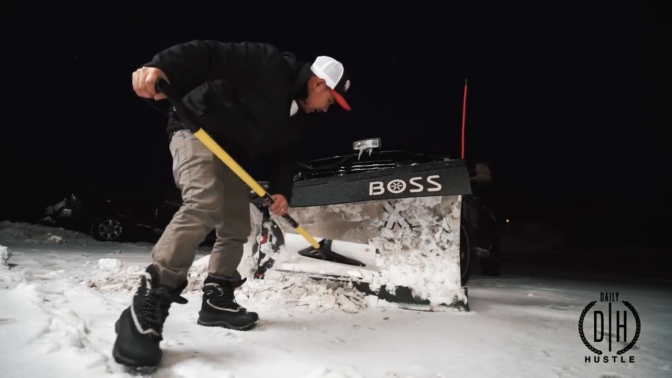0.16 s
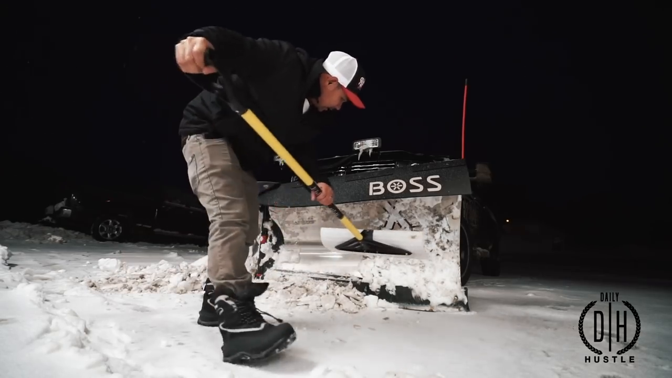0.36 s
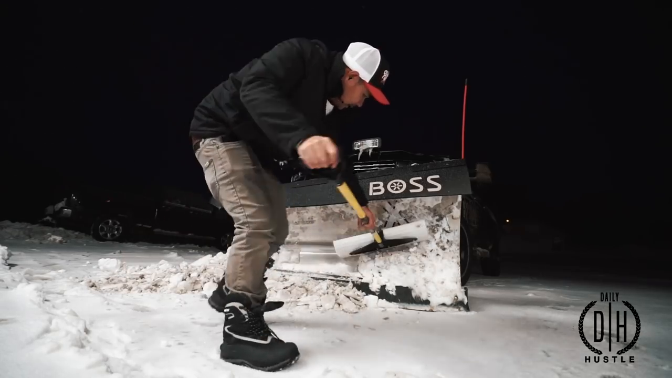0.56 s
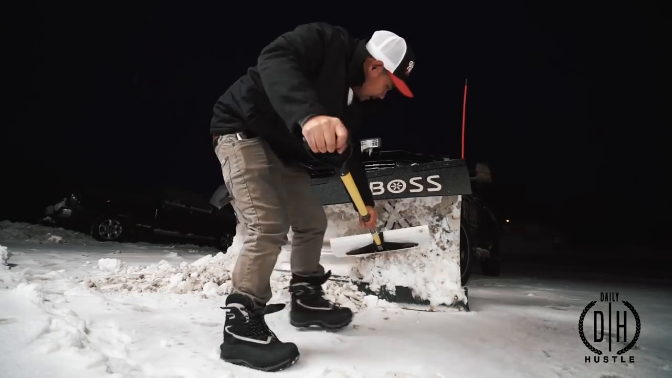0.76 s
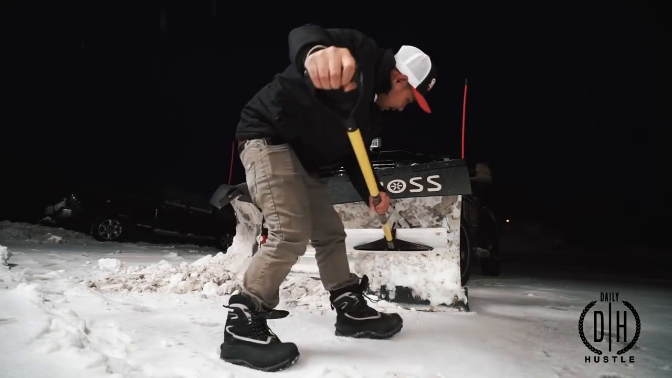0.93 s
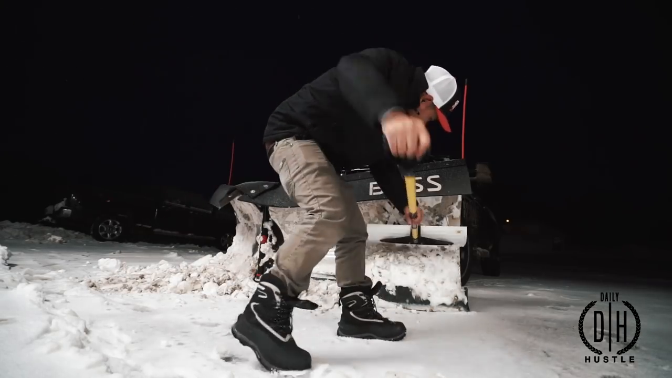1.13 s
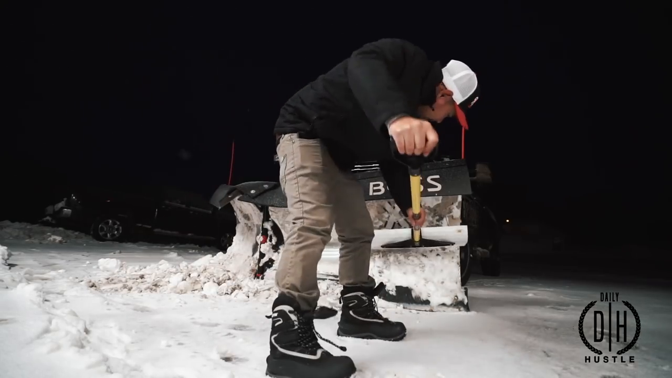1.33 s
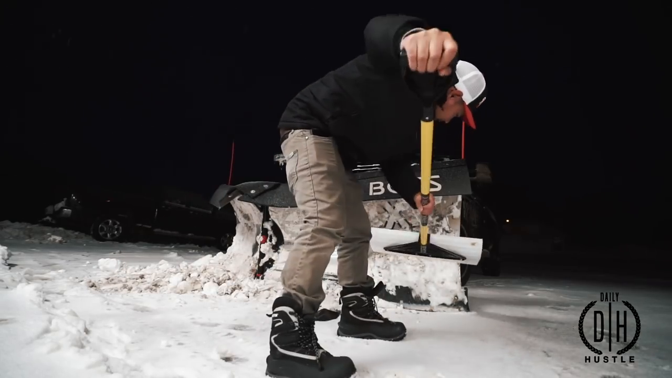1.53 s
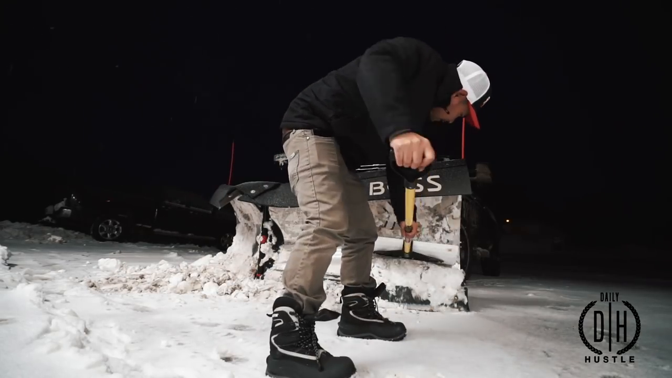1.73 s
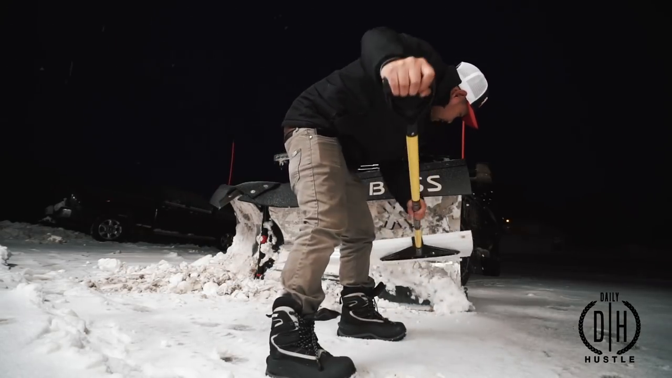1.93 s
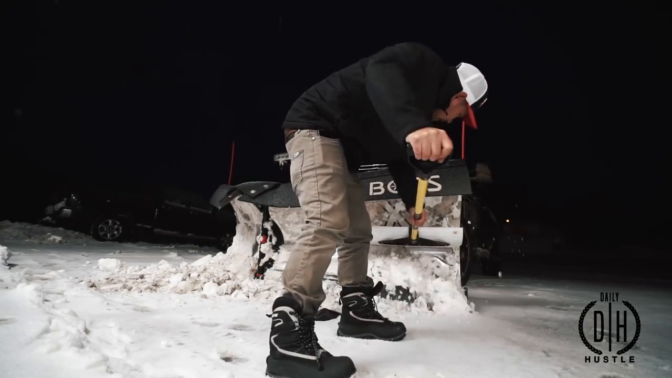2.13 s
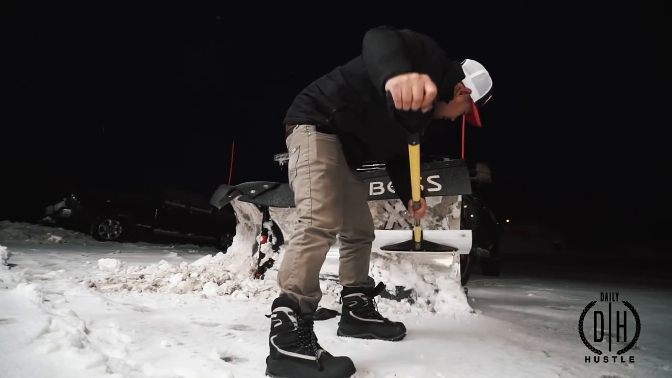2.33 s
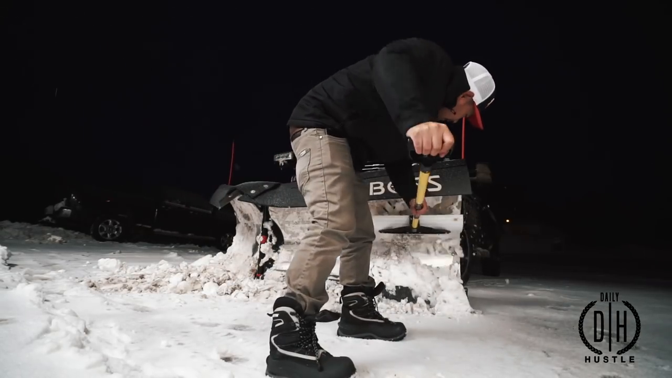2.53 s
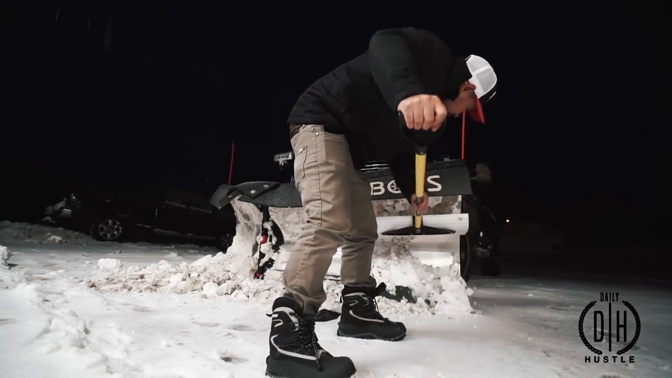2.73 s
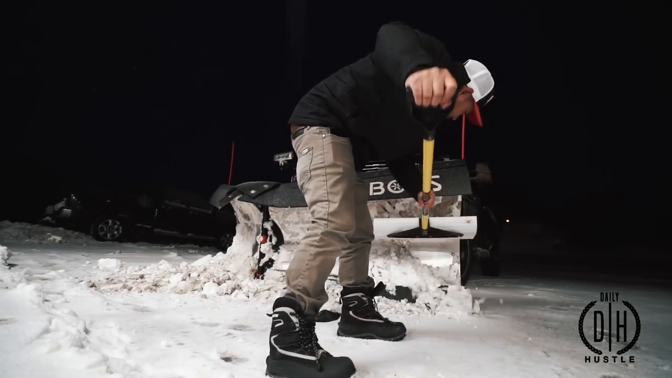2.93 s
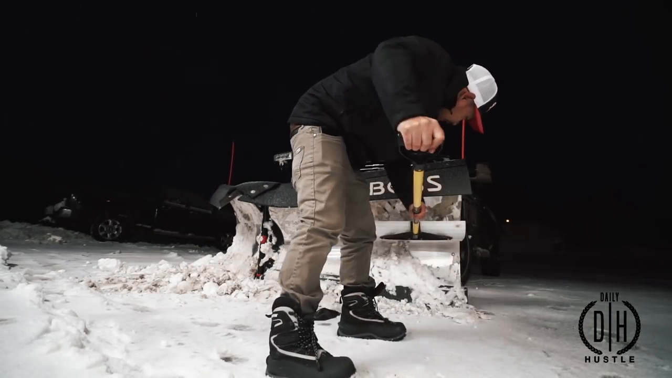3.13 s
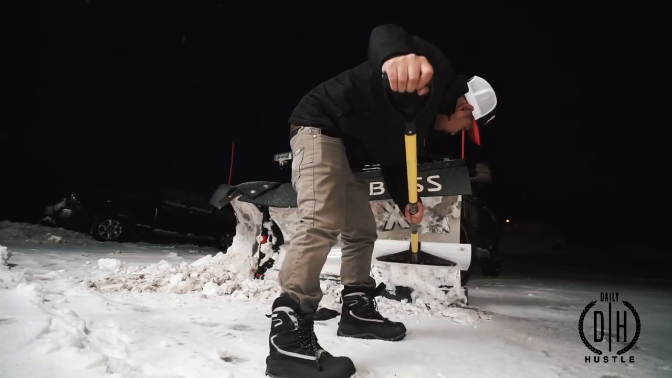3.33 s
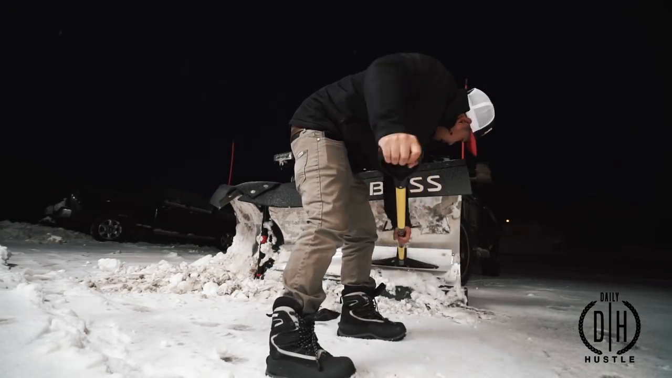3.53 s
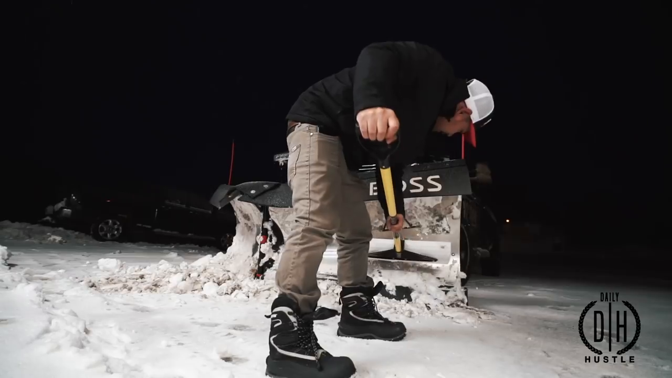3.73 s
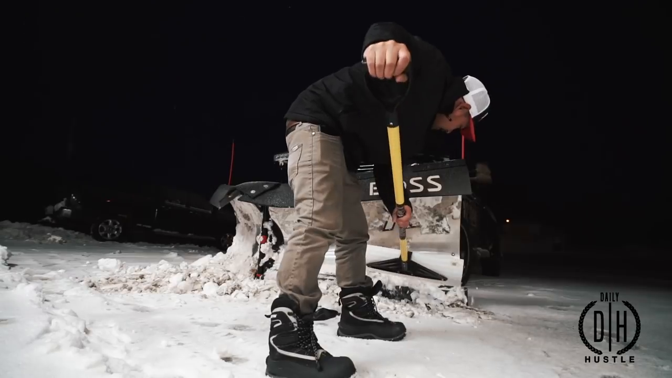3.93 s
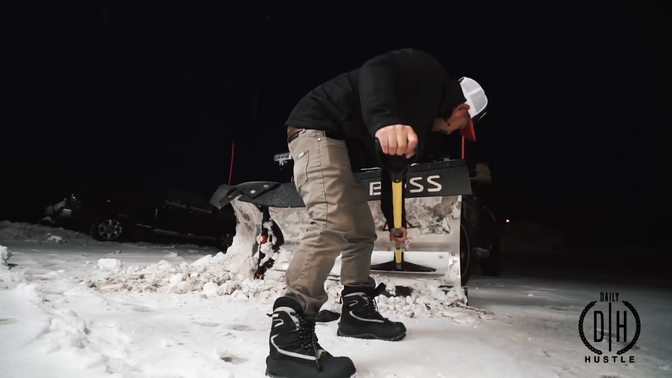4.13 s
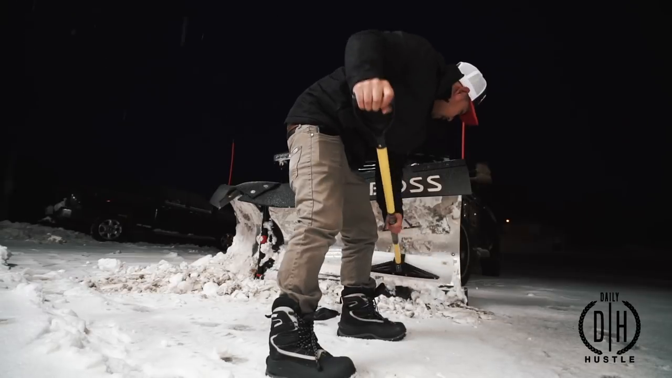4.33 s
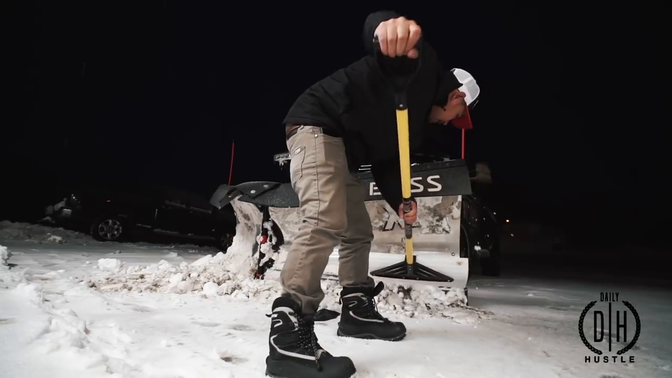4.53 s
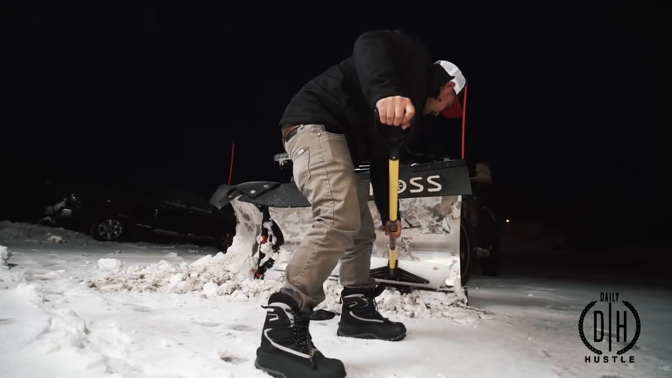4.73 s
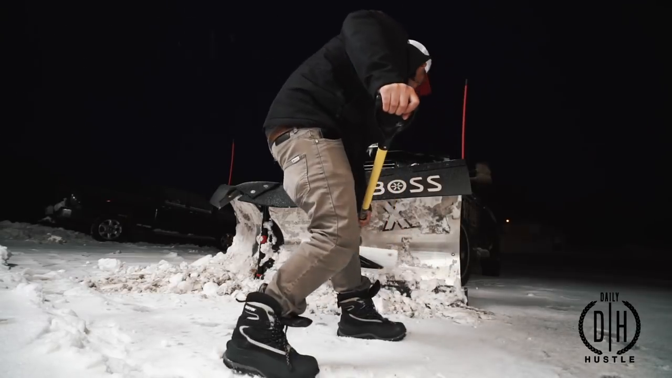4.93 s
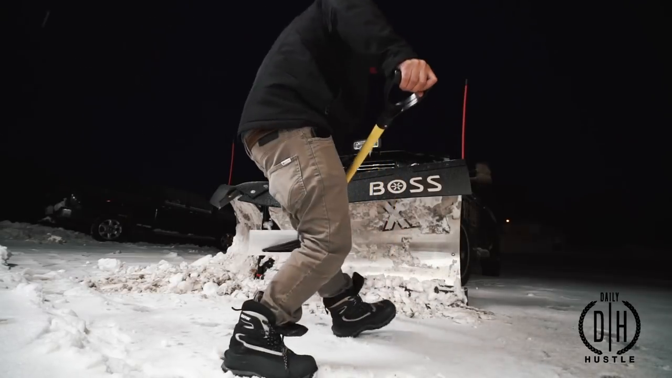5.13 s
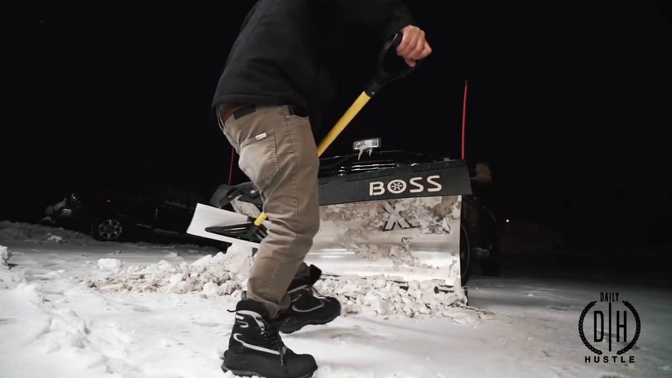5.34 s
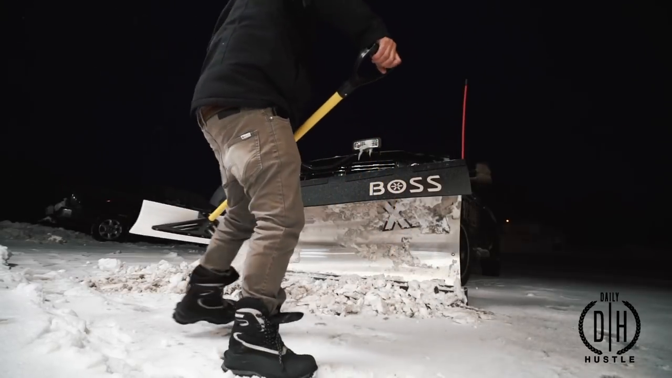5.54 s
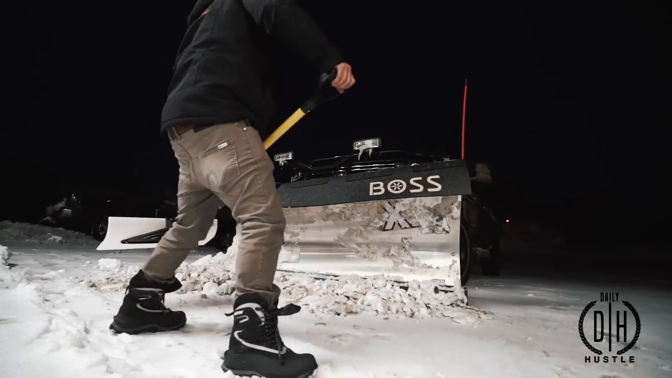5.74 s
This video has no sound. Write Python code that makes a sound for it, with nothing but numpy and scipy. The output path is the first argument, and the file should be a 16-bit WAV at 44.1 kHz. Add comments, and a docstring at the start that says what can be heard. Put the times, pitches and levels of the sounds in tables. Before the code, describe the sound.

Outdoors at night, a plastic shovel breaks packed snow from a steel plow blade. Light crunches come first, then nine hard, quick chops, each a bright crack with a dull low metallic thump and a short scrape. Crumbs slide between blows. The chopping ends just before five seconds, with a brief snow rush and faint ticks over a low idling engine. Close microphone, mono, slightly overloaded on the loudest hits.

```python
"""A plastic shovel chops and scrapes packed snow off a steel plough blade, outdoors at night.
Each chop is a burst of grains for the breaking crust, plus noise that excites the shovel's resonances.
Dull thumps and driven strokes excite the blade's low modes; scraping, sliding snow and specks are
random clicks, dense or scattered. A truck idles nearby as a sum of engine orders, over steady filtered noise.
A limiter ducks everything under the loud blows, and the highest peaks clip."""
import sys
import numpy as np
from scipy import signal
from scipy.fft import rfft, irfft, next_fast_len
from scipy.io import wavfile
from scipy.ndimage import uniform_filter1d

SR = 44100
rng = np.random.default_rng(int(sys.argv[2]) if len(sys.argv) > 2 else 0)


def dump(signal):
    """Clip the signal to [-1, 1] and save it as 16-bit WAV at the path in sys.argv[1]."""
    limited = np.clip(np.atleast_2d(signal).T, -1, 1)
    pcm = np.round(limited * 32767).astype(np.int16)
    wavfile.write(sys.argv[1], SR, pcm)


N = 259308

# resonances of the steel blade: (frequency [Hz], width [Hz], relative gain [dB])
BLADE_MODES = [(146, 36, 9), (229, 43, 16), (262, 64, 4.5), (335, 79, 11.5), (420, 31, -8.5), (501, 17, -1),
               (546, 30, -40.5)]
# resonances of the plastic shovel: (frequency [Hz], width [Hz], relative gain [dB])
SHOVEL_MODES = [(738, 99, 9), (997, 230, 4), (1151, 70, 17), (1290, 80, 9.5), (1443.5, 40, 8)]
# spectrum of breaking crust: (frequency [Hz], relative gain [dB])
CRUST_SPECTRUM = [(290, -16.5), (500, -8.5), (1650, -11), (3320, -9.5), (4380, -12), (5210, -17.5),
                  (9070, -16.5), (9750, -15.5), (14400, -57.5), (16200, -103)]
# spectrum of loose crumbs: (frequency [Hz], relative gain [dB])
CRUMB_SPECTRUM = [(240, -31.5), (400, -20), (688, -9), (983, -6), (1170, -6), (1940, -6.5), (3610, -12.5),
                  (9440, -25.5), (16200, -31.5)]


def amp(db):
    """Decibels to amplitude ratio: 20 dB is a factor of ten."""
    return 10 ** (np.asarray(db) / 20)


def evened(x):
    """Normalization to an rms of one."""
    return x / np.sqrt(np.mean(x ** 2) + 1e-20)


def along(rows):
    """Linear interpolation of a time table's columns, one value a sample."""
    times, *columns = np.transpose(rows)
    return [np.interp(np.arange(N) / SR, times, column) for column in columns]


def colour(x, points, tilt_db=0.):
    """Spectral shaping in the frequency domain, with a tilt in dB an octave about 3 kHz."""
    size = next_fast_len(len(x) + 512)
    hz = np.fft.rfftfreq(size, 1 / SR) + 1  # the offset keeps the logarithm finite
    point_hz, point_db = np.transpose(points)
    shape_db = np.interp(np.log(hz), np.log(point_hz), point_db)
    shape_db += tilt_db * np.log2(np.maximum(hz, 500) / 3000)  # no further tilt below 500 Hz
    return irfft(rfft(x, size) * amp(shape_db), size)[:len(x)]


def ring(x, modes):
    """Modal superposition: parallel two-pole resonances, each of the given gain at its peak."""
    out = np.zeros(len(x))
    for hz, width, db in modes:
        b, a = signal.iirpeak(hz, hz / width, SR)
        out += amp(db) * signal.lfilter(b, a, x)
    return out


def resonate(x, hz, width):
    """Resonance at a moving pitch by heterodyning: shift down, smooth twice, shift back."""
    carrier = np.exp(2j * np.pi * np.cumsum(hz * np.ones(len(x))) / SR)
    pole = np.exp(-np.pi * width / SR)
    smoothed = signal.lfilter([1], np.convolve([1, -pole], [1, -pole]), x / carrier)
    return (carrier * smoothed).real


def steadied(x, s):
    """Automatic gain: divides by a running rms over s seconds, with a floor for quiet parts."""
    power = uniform_filter1d(x ** 2, round(s * SR))
    return x / np.sqrt(power + 0.054 * np.mean(x ** 2))


def grit(per_s, spread_db, count=N):
    """Random impulses at a mean rate, of uneven size and random polarity."""
    chance = rng.random(count)
    size = np.minimum(rng.exponential(1, count), 4)
    polarity = rng.standard_normal(count)
    return (chance < per_s / SR) * amp(spread_db * size) * polarity


def add(mix, s, sound):
    """Superposition: mixes a sound in at a time, cut at the end of the mix."""
    part = mix[round(s * SR):][:len(sound)]
    part += sound[:len(part)]


def night():
    """Stationary noise shaped by filtering: steady far rumble and hiss."""
    # spectrum of the night: (frequency [Hz], relative gain [dB])
    night_spectrum = [(35, -28), (60, -20), (136, -33), (340, -38.5), (382, -33.5), (410, -37.5),
                      (569, -38), (625, -50), (13500, -71), (16200, -67.5)]
    return amp(-42.5) * evened(colour(rng.standard_normal(N), night_spectrum))


def truck():
    """Harmonic synthesis: low multiples of an engine's firing rate, each wavering a little."""
    # the idling engine: (time [s], firing rate [Hz], level [dB])
    idle = [(0, 25.23, -29), (1.5, 25.83, -29), (3, 26.2, -34), (4.5, 25.73, -36.5), (5.88, 25.37, -35.5)]
    # its harmonics: (multiple of the firing rate, relative level [dB])
    orders = [(2, -2.5), (3, -15.5), (4, -16.5), (8, -23)]
    firing_hz, level_db = along(idle)
    cycles = np.cumsum(firing_hz) / SR
    out = np.zeros(N)
    for k, order_db in orders:
        drift = uniform_filter1d(rng.standard_normal(N), 3000)
        waver = evened(uniform_filter1d(drift, 3000))
        # higher orders waver more, both in level and in phase
        phase = 2 * np.pi * (round(k) * cycles + 0.045 * k * waver)
        out += amp(order_db + 0.15 * k * waver) * np.sin(phase)
    return np.sqrt(2) * amp(level_db) * out


def specks():
    """Isolated impacts: now and then a single ice speck ticks on the steel."""
    return amp(-66) * evened(colour(grit(30, 2.5), CRUST_SPECTRUM, 2.5))


def slides():
    """Granular noise: rushes of sliding snow and two short ticks, as dense grains with quick edges."""
    # rushes of snow, and two short ticks near 5.07 and 5.28 s:
    # (start [s], end [s], level [dB], brightness [dB an octave])
    grain_bursts = [(0.017, 0.1, -40, -11), (1.007, 1.084, -34.5, 0.5), (3.429, 3.478, -34.5, -3.5),
                    (4.319, 4.366, -31, -0.5), (4.903, 5.035, -35, -0.5), (5.117, 5.245, -40.5, 0.3),
                    (5.07, 5.086, -40, 3.5), (5.284, 5.305, -43, 5), (5.786, 5.849, -44, 0.5)]
    out = np.zeros(N)
    for start, end, db, tilt_db in grain_bursts:
        count = round((end - start) * SR)
        clumps = evened(uniform_filter1d(rng.standard_normal(6000), 500))
        grains = colour(grit(6000, 2.2, count=6000), CRUMB_SPECTRUM, tilt_db)
        burst = evened(grains * amp(2.5 * clumps))[:count]
        add(out, start, amp(db) * burst * signal.windows.tukey(len(burst), .2))
    return out


def drag():
    """Stick-slip friction: slow slips shake the blade, quicker ones the shovel, crumbs fizz."""
    # the edge drags through snow: (time [s], crumb level [dB], shovel level [dB])
    scrape = [(0, -44.5, -40.5), (.56, -46.5, -47.5), (.74, -31, -26), (.83, -42, -27), (1.01, -39.5, -39),
              (1.15, -36.5, -63), (1.24, -47, -56), (1.79, -46.5, -53), (1.91, -42.5, -33),
              (2.13, -39, -65), (2.24, -27, -35), (2.39, -47, -57), (2.62, -34.5, -44), (2.75, -33, -48),
              (2.93, -42, -38), (3.26, -44.5, -41.5), (3.46, -50, -60), (3.68, -39, -46),
              (3.93, -47.5, -48), (4.32, -43.5, -49), (4.47, -55.5, -51), (4.72, -49.5, -57),
              (4.85, -46, -51), (4.93, -29.5, -46), (5.09, -52, -51), (5.29, -53, -62), (5.53, -68, -58),
              (5.88, -46.5, -71)]
    crumbs_db, rattle_db = along(scrape)
    judder_db = -41.5 + 0.68 * (crumbs_db + 43.5)  # the blade follows the crumbs with smaller swings
    judder = evened(ring(grit(400, 0.83), BLADE_MODES))
    rattle = evened(ring(grit(900, 1), SHOVEL_MODES))
    clumps = evened(uniform_filter1d(rng.standard_normal(N), 300))  # crumbs come in clumps a few ms long
    crumbs = evened(colour(grit(7000, 1.2), CRUMB_SPECTRUM) * amp(3.1 * clumps))
    return amp(judder_db) * judder + amp(rattle_db) * rattle + amp(crumbs_db) * crumbs


def thumps():
    """Soft impact: a short decaying tone, and a blunt push that excites the blade's modes."""
    # dull knocks on the blade and lumps that land:
    # (time [s], relative level [dB], pitch [Hz], 60 dB decay time [s], held to 0.3 s at most)
    knocks = [(0.192, -27.5, 130, 0.076), (0.511, -21.5, 297, 0.079), (0.677, -7.5, 282, 0.072),
              (0.741, -26, 215, .13), (0.851, -22, 286, 0.13), (1.038, -30, 237, .048),
              (1.093, -25.5, 172, 0.13), (1.144, -18, 201, 0.041), (1.32, -3, 270, 0.071),
              (1.565, -34, 340, 0.082), (1.757, -4, 241, 0.099), (1.803, -8.5, 249, 0.046),
              (1.882, -25.5, 282, .17), (2.224, -7, 235, 0.064), (2.34, -23, 265, 0.054),
              (2.411, -35.5, 370, .24), (2.553, -21, 277, .11), (2.684, -9.5, 290, 0.084),
              (2.796, -29, 296, 0.32), (2.936, -27.5, 270, 0.083), (3.127, -4, 292, .066),
              (3.164, -11, 280, 0.074), (3.689, -8.5, 267, 0.1), (3.79, -16, 276, 0.1),
              (4.024, -34, 400, .058), (4.185, -8.5, 224, 0.044), (4.255, -5, 230, 0.057),
              (4.334, -15, 256, 0.094), (4.408, -17, 306, 0.065), (4.766, 0, 243, 0.067),
              (4.792, -5, 238, 0.098), (5.069, -17, 144, 0.071), (5.21, -27.5, 362, 0.096),
              (5.286, -24.5, 222, 0.081), (5.773, -35.5, 172, .091), (5.868, -12.5, 205, 0.072)]
    t = np.arange(8000) / SR
    tone, push = np.zeros(N), np.zeros(N)
    for s, db, hz, t60 in knocks:
        t60 = np.clip(t60, .02, .3)
        swell = (1 - np.exp(-t / 0.0017)) * amp(-60 * t / t60)
        add(tone, s, amp(db + 6.0) * swell * np.sin(2 * np.pi * hz * t))
        knock = amp(-60 * t / 0.013) * np.sin(2 * np.pi * 1.86 * hz * t)  # a brief overtone at the start
        add(tone, s, amp(db - 2.5) * knock)
        add(push, s, amp(db + 8.5) * swell * rng.standard_normal(len(t)))
    b, a = signal.butter(2, 700, fs=SR)  # a soft blow has little treble
    return tone + ring(signal.lfilter(b, a, push), BLADE_MODES)


def shudder():
    """Forced modal vibration: slips of the edge keep the blade's low modes going until it lifts off."""
    # the edge is driven down the blade: (start [s], drive [s], release [s], relative blow level [dB],
    # relative level at lift-off [dB], main pitch [Hz], deep mode gain [dB])
    strokes = [(.61, 0.072, 0.15, 3.5, -15.5, 241, -14), (1.25, 0.09, .12, 3, -23, 270, 3),
               (1.72, 0.099, 0.053, 3, -20.5, 286, -27), (2.17, 0.06, 0.1, 3.5, -18, 256, -2),
               (2.61, 0.08, 0.053, 4.5, -19, 288, -3), (3.08, .09, 0.043, 2.5, -16.5, 257, -2.5),
               (3.6, 0.097, 0.023, -6, -11, 257, -16.5), (4.19, 0.062, 0.058, -9, -13, 272, -9.5),
               (4.72, 0.069, 0.093, 2, -14.5, 260, -9)]
    # a deep mode of the blade: (frequency [Hz], width of each pole [Hz])
    deep_mode = (149.5, 20)
    release_db, freed_hz = -18, 15  # after lift-off the shudder dies and its pitch climbs
    out = np.zeros(N)
    for s, drive_s, release_s, blow_db, lift_db, pitch_hz, deep_db in strokes:
        t = np.arange(0, drive_s + release_s, 1 / SR)
        knees = [0, drive_s, drive_s + release_s]
        db = np.interp(t, knees, [blow_db, lift_db, lift_db + release_db])
        hz = np.interp(t, knees, [pitch_hz, pitch_hz, pitch_hz + freed_hz])
        slips = grit(500, 1.4, count=len(t))
        main = steadied(resonate(slips, hz, 90), 0.09)
        main = main + 0.55 * evened(ring(slips, BLADE_MODES))
        deep = steadied(resonate(slips, *deep_mode), 0.089)
        crushed = colour(grit(2500, 3, count=len(t)), CRUMB_SPECTRUM, -3.5)
        crunch = evened(crushed + 0.83 * ring(crushed, SHOVEL_MODES))  # snow crushed under the edge
        stroke = main + amp(deep_db) * deep + amp(-7) * crunch
        add(out, s, amp(db) * stroke * signal.windows.tukey(len(t), .15))
    return out


def cracks():
    """Brittle fracture: bursts of crust grains, each with its own colour, that also excite the shovel."""
    # the edge breaks crust: (time [s], relative level [dB], shovel level over the crack before trims [dB],
    # 60 dB decay time [s], brightness [dB an octave])
    breaks = [(0.1022, -9.5, -7.5, .051, -2.5), (0.2256, -12.5, -18, .055, -2.5),
              (0.2931, -25.5, -4.5, 0.047, 4), (0.3536, -8.5, -13.5, 0.025, -2.5),
              (0.439, -31, -25, .023, 4), (0.4984, -26, -2, 0.094, 0.5), (0.5172, -14.5, 0, 0.027, -4),
              (0.614, 22, -7, 0.031, -2.5), (0.6575, 4, -5, 0.051, -4), (0.68, 2, -3.5, 0.038, 3),
              (0.7565, -7, 6.5, 0.032, 16), (0.7867, -9, -3.5, 0.066, -6), (0.827, -16, -15, 0.11, -6.5),
              (0.851, -10.5, 2, 0.047, -3.5), (0.884, -16, -12, 0.023, 0), (0.9082, -16, -11, 0.086, -4),
              (0.9752, -25, 1, .054, 5), (1.0136, -31.5, 6, 0.13, -3), (1.1116, -12.5, -14, 0.042, -17),
              (1.198, -18, -4.5, 0.021, -5.5), (1.2489, 12, 0, 0.024, 5.5), (1.3213, -8.5, 1.5, .084, -24),
              (1.345, -8.5, 3.5, .052, -2), (1.359, -8, 5.5, 0.037, 3), (1.3739, -19.5, 9.5, 0.041, 2),
              (1.5701, -29, 4.5, 0.04, -3.5), (1.721, 16, -11, 0.036, -0.8), (1.7556, -1, 1.5, 0.066, -1),
              (1.8012, -14, 3.5, 0.06, 2.5), (1.8822, -24.5, 4.5, 0.088, 1), (2.0277, -20.5, -10, .052, -2),
              (2.0604, -21.5, -5, 0.057, 0.5), (2.142, -22, 0.5, 0.1, -1.5), (2.169, 4, -3.5, 0.041, 2),
              (2.1794, 18.5, -5.5, 0.018, -4.4), (2.245, -16, 3.5, .049, -1), (2.2706, -10.5, 1, 0.053, -2),
              (2.2832, -9, 5, 0.045, -0.5), (2.34, -15.5, 3.5, .034, 1.5), (2.3587, -21.5, -1.5, 0.11, -6),
              (2.3884, -26.5, -1, 0.028, .1), (2.411, -21, 4, 0.062, -8.5), (2.5545, 3, -9, .025, -3.5),
              (2.613, 13, -7, 0.032, -1), (2.734, -17, -4, 0.028, 0.5), (2.7763, -18, -13, 0.028, -2),
              (2.799, -12, -2, 0.021, -1), (2.9355, -18, -2, 0.035, 1), (2.971, -15.5, -15, .06, -3),
              (3.0779, 22.5, -16, 0.04, -3.5), (3.0974, -2, -22, .025, -32), (3.1426, -0.5, -38, 0.1, -12),
              (3.259, -15.5, -20, 0.049, -3), (3.3244, -24.5, -4.5, 0.044, -2.3),
              (3.4217, -26.5, 2, 0.073, -1.5), (3.453, -14.5, -6.5, 0.018, 0), (3.472, -31, 8, .029, 12),
              (3.483, -26.5, 12.5, .048, -5), (3.5925, -5.5, -7.5, 0.032, 5), (3.607, 8.5, -18, 0.051, -4),
              (3.6209, 11, -4.5, 0.025, -0.5), (3.6499, 2.5, -15, 0.047, -8.5),
              (3.673, -5, -20, .075, -4.5), (3.793, -28, 10, .14, -1.5), (4.0243, -31.5, -8, 0.052, 3),
              (4.1686, -13, -19, .042, -2), (4.1925, -5.5, -17, 0.077, 8), (4.2018, 3, -10, 0.074, -5),
              (4.2345, -6, -16, 0.067, -3), (4.3396, -28.5, 9.5, 0.083, 1),
              (4.4812, -28, -2.5, 0.068, -4.5), (4.6435, -37, -6, 0.092, -1.5),
              (4.7116, -13.5, -0.5, 0.089, 2.5), (4.7286, 17, -18, 0.029, -6), (4.7664, -7, -18, 0.021, -4),
              (4.812, -6, -6, 0.04, -8.5), (4.9093, -21, -6, 0.032, 8), (4.9959, -34, 6, 0.096, 2),
              (5.212, -37, 2, .059, 11), (5.7722, -25.5, -1, 0.047, .5)]
    t = np.arange(6000) / SR
    out = np.zeros(N)
    for s, db, ring_db, t60, tilt_db in breaks:
        t60 = np.clip(t60, .01, .3)
        rise_s = .0026 * amp(0.1 * db)  # heavier cracks take longer to build
        # rises, then dies away slightly faster than exponentially
        swell = (1 - np.exp(-t / rise_s)) * amp(-60 * (t / t60) ** 1.127)
        snaps = evened(colour(grit(3500, 1.3, count=len(t)), CRUST_SPECTRUM, tilt_db))
        lump_hz = 1800 * 4 ** rng.random(3)  # sizes of the lumps that break
        lumps = ring(snaps, [(hz, 0.35 * hz, 4) for hz in lump_hz])
        dull = uniform_filter1d(snaps, 6)
        treble = (snaps - dull) * amp(-45 * t / t60)  # the treble dies first
        crust = dull + lumps + treble
        # a new spot is struck each time, so the mode gains vary
        struck = [(hz, width, gain_db + 5.6 * rng.standard_normal()) for hz, width, gain_db in SHOVEL_MODES]
        shake = ring(rng.standard_normal(len(t)) * swell, struck)
        shake *= np.max(swell) / np.max(abs(shake))  # the spot sets the colour, the blow the strength
        crack = amp(db - 9) * crust * swell + amp(db + ring_db + 7.0) * shake
        add(out, s - .001, crack)  # starts 1 ms ahead of its listed time
    return out


def yard(x):
    """Convolution with a sparse decaying impulse response: short echoes off the blade and truck."""
    t = np.arange(8000) / SR
    tail = grit(2500, 0.5, count=len(t)) * amp(-60 * t / 0.25) * (t > .003)
    return signal.fftconvolve(x, tail / np.linalg.norm(tail))[:N]


def scene():
    """Superposition of sources: the shovel close by, over the engine and the night."""
    work = cracks() + thumps() + shudder()
    echoes = amp(-18.0) * yard(work)
    snow = drag() + slides() + specks()
    return (work + echoes + snow + truck() + night())[None]


def record(dry):
    """Dynamic range limiting: a quick limiter ducks all under each blow, peaks clip, then a low-pass."""
    threshold_db, recovery_db_per_s, duck_per_db = -11, 170., .65
    power_db = 10 * np.log10(abs(uniform_filter1d(dry[0] ** 2, 300)) + 1e-12)
    fall = np.arange(N) * recovery_db_per_s / SR
    held_db = np.maximum.accumulate(power_db + fall) - fall  # peaks held, then falling steadily
    over_db = np.maximum(held_db - threshold_db, 0)
    ducked = dry / amp(duck_per_db * uniform_filter1d(over_db, 150))
    clipped = np.clip(ducked, -1, 1)
    low_pass = signal.firwin(511, 16300, window=("kaiser", 9), fs=SR)  # cutoff in Hz
    return signal.oaconvolve(clipped, low_pass[None], "same")


dry = scene()
out = record(dry)
dump(out)
```